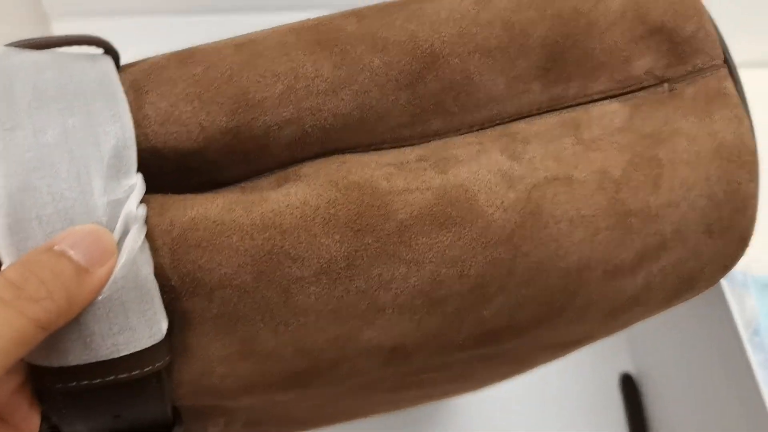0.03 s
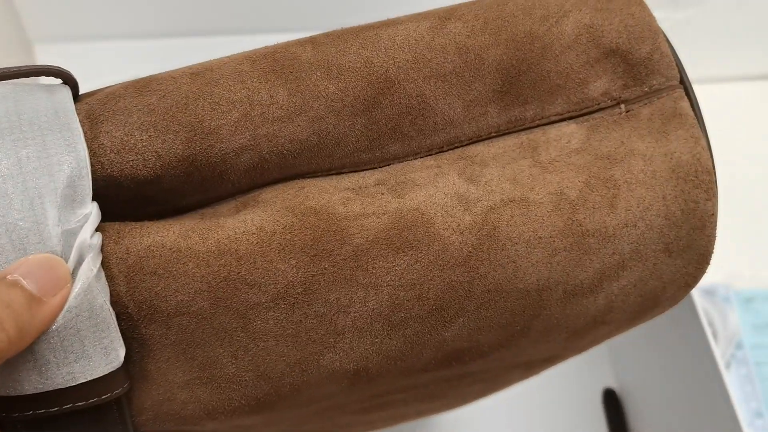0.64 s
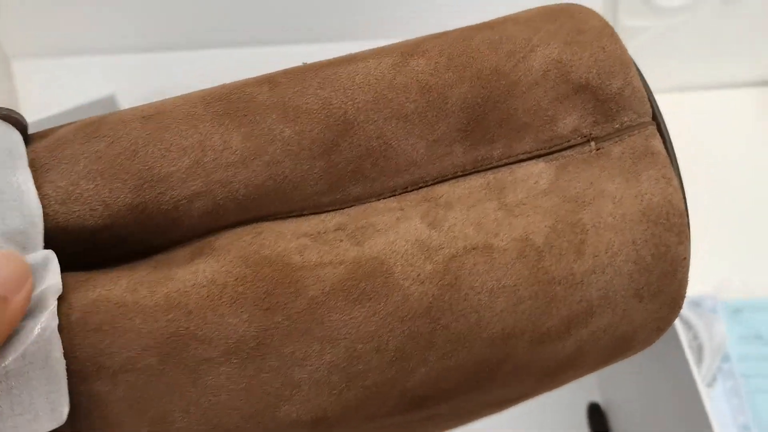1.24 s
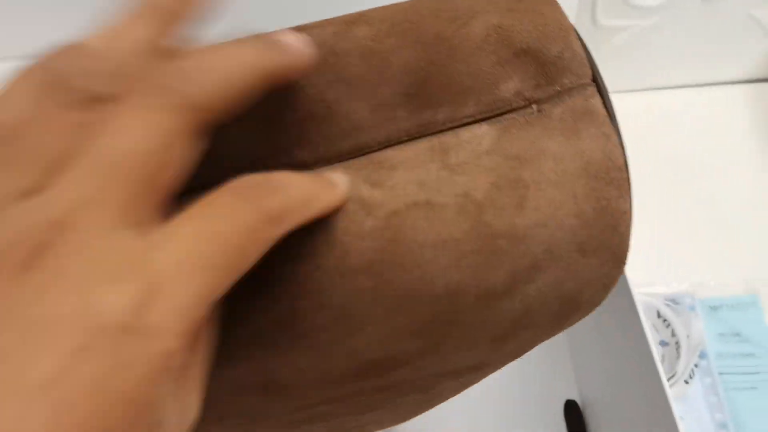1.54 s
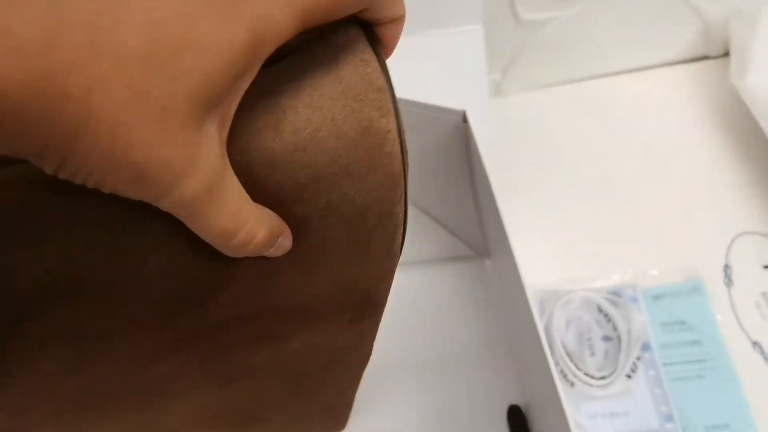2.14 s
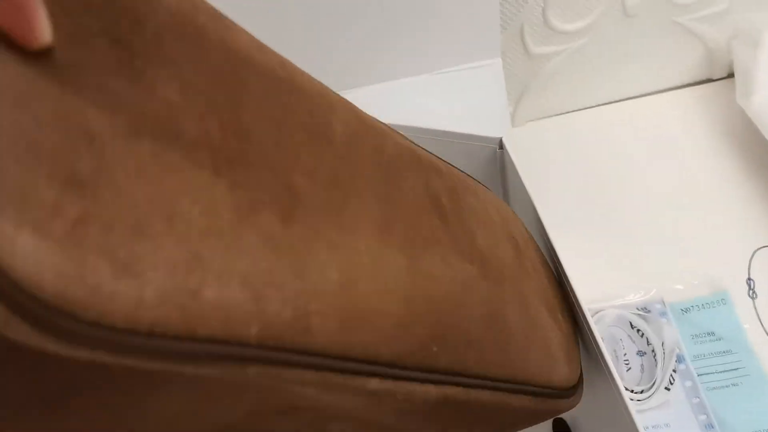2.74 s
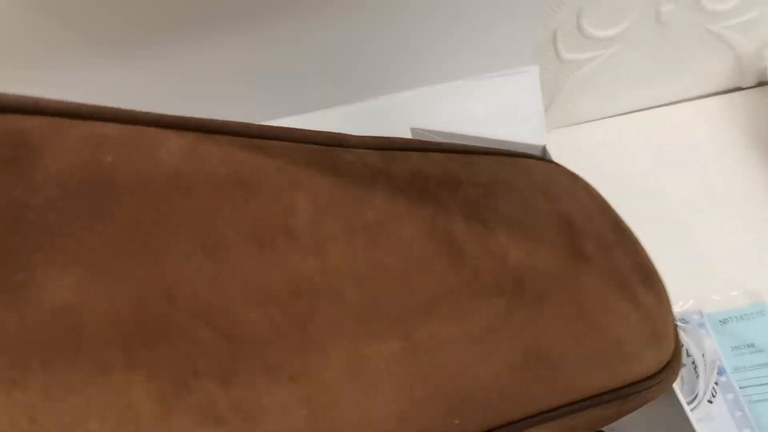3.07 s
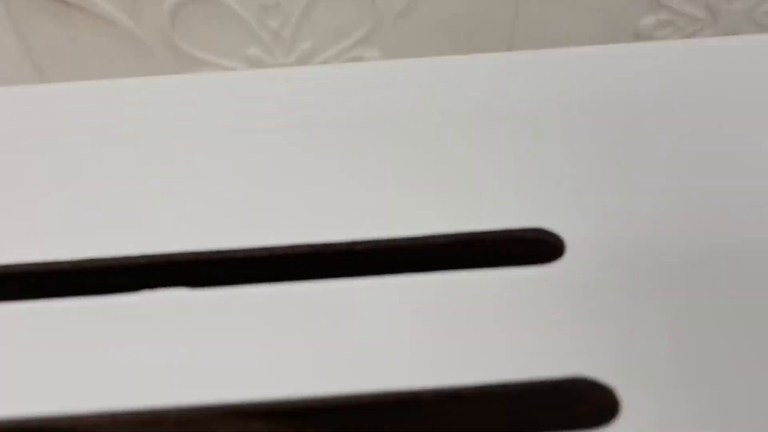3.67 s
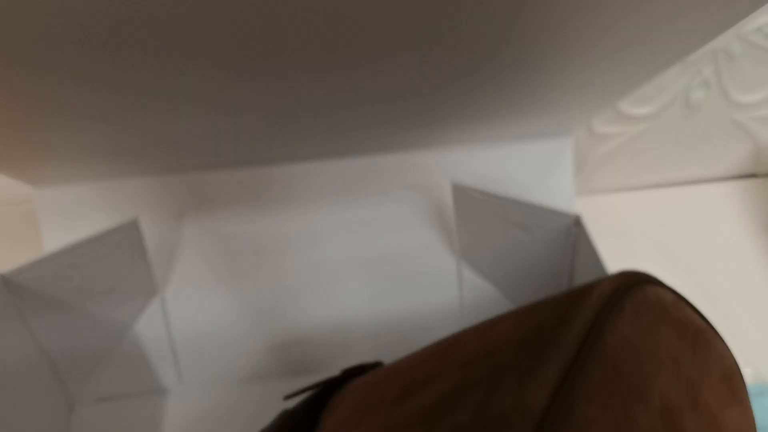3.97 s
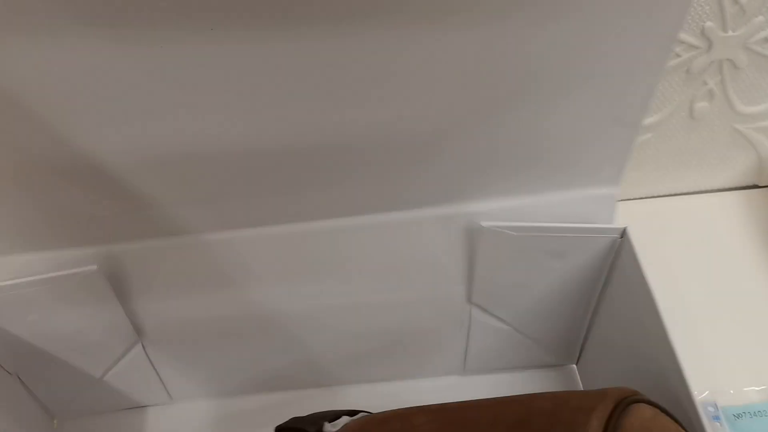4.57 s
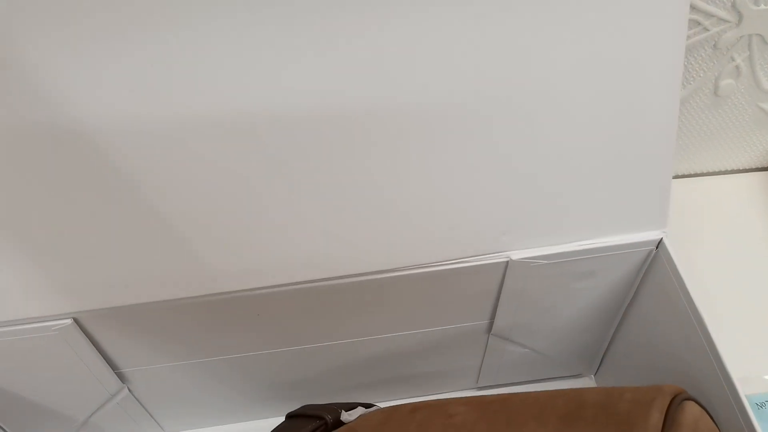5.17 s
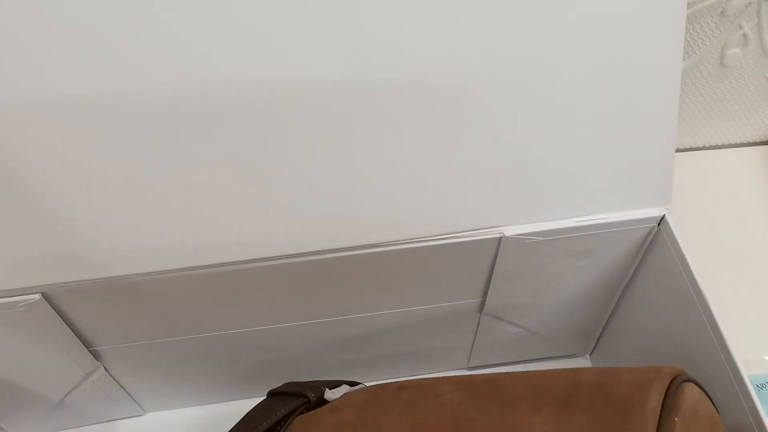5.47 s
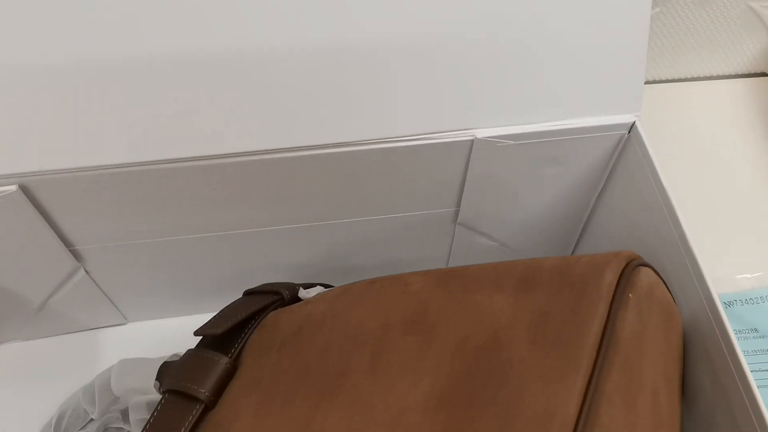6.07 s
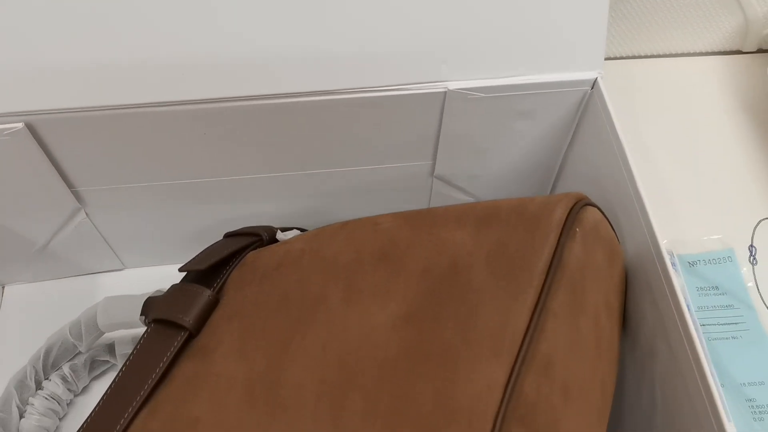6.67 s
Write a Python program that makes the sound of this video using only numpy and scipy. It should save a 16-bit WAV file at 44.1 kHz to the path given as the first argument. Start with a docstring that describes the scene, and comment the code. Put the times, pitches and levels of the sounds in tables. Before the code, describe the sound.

Suede hisses under a hand, then a bag bumps and scrapes inside a hollow cardboard box, its strap fittings ticking lightly.

```python
"""A suede handbag is stroked, gripped and tipped into a large cardboard gift box.
The nap hisses under the hand and along the card, with soft, darker rustles here and there.
Bag and lid knock on the box, which rings hollow while its big panels boom; the bag scrapes and shifts.
Strap fittings and tissue wrapping tick over the low rumble of a small room, all close to a phone."""
import sys
import numpy as np
from scipy import signal
from scipy.fft import rfft, irfft, next_fast_len
from scipy.io import wavfile
from scipy.ndimage import uniform_filter1d, map_coordinates

SR = 44100
rng = np.random.default_rng(int(sys.argv[2]) if len(sys.argv) > 2 else 0)


def file_out(sig):
    """Save sig as 16-bit WAV at sys.argv[1]."""
    # one column per channel
    cols = np.atleast_2d(sig).T
    # limit, then scale
    lim = np.clip(cols, -1, 1)
    pcm = np.round(lim * 32767).astype(np.int16)
    wavfile.write(sys.argv[1], SR, pcm)


N = 300321


def amp(db):
    """Decibels to gain."""
    return 10 ** (np.asarray(db) / 20)


def unit(x):
    """Scale to rms 1."""
    return x / np.sqrt(np.mean(x ** 2) + 1e-20)


def along(points, hz):
    """Read (frequency, value) points on a log-frequency axis."""
    f, v = np.transpose(points)
    return np.interp(np.log(hz + 1), np.log(f + 1), v)


def bump(hz, centre_hz, octaves):
    """A bell on the log-frequency axis."""
    return np.exp(-.5 * (np.log2((hz + 1) / centre_hz) / octaves) ** 2)


def wobble(rate):
    """A smooth random curve, rate knots a second."""
    return map_coordinates(rng.standard_normal(int(N * rate / SR) + 4), [np.arange(N) * rate / SR])


def filtered(x, response):
    """Pass x through a complex frequency response."""
    n = x.shape[-1]
    m = next_fast_len(n + 8192)
    return irfft(rfft(x, m) * response(np.fft.rfftfreq(m, 1 / SR)), m)[..., :n]


def band(x, edges_hz, order):
    """Band-pass x and scale its mid channel to peak 1."""
    y = signal.sosfilt(signal.butter(order, edges_hz, "band", fs=SR, output="sos"), x)
    return y / np.abs(y.mean(0)).max()


def noise(n):
    """Two unrelated channels of white noise."""
    return rng.standard_normal((2, n))


def spread(pair):
    """Turn two unrelated signals into left and right: alike in the bass, apart in the treble."""
    # stereo image: (frequency [Hz], left-right correlation [ratio])
    likeness = [(30, 0.15), (80, 0.87), (300, 0.89), (700, 0.59), (1400, 0.15), (3000, 0.01), (12000, 0.24)]
    turn = lambda hz: np.arccos(along(likeness, hz)) / 2
    mid, side = filtered(pair, lambda hz: np.array([np.cos(turn(hz)), np.sin(turn(hz))]))
    return np.array([mid + side, mid - side])


def panned(x, lean_db):
    """Lean a stereo sound to the left by a level difference."""
    gains = np.array([amp(lean_db / 2), amp(-lean_db / 2)]).reshape(2, -1)
    return x * gains / np.sqrt(np.mean(gains ** 2, axis=0))


def add(track, s, x):
    """Mix x into the track at time s."""
    start = max(round(s * SR), 0)
    track[:, start:start + x.shape[1]] += x[:, :max(N - start, 0)]


def rush(spectrum, grain_db, grain_rate):
    """Coloured stereo noise of rms 1, clumped into grains."""
    grains = noise(N) * amp(grain_db * wobble(grain_rate))
    return unit(filtered(spread(grains), lambda hz: amp(along(spectrum, hz))))


def patchy(x, depth_db):
    """Let the colour drift as the contact patch moves over the folds."""
    spectra = signal.stft(x, nperseg=1024)[2]
    drift = uniform_filter1d(rng.standard_normal(spectra.shape[1:]), size=6, axis=0)
    drift = unit(uniform_filter1d(drift, size=8, axis=1))
    return unit(signal.istft(spectra * amp(depth_db * drift), nperseg=1024)[1][:, :N])


def swells(s, rise, fall, db):
    """Envelope of a run of movements: each speeds up to its peak and dies away; their powers add."""
    shape = 1.52  # 1 is pointed, 2 a bell
    t = np.arange(0, N, 64) / SR
    lag = t[:, None] - s
    from_peak = np.abs(lag) / np.maximum(np.where(lag < 0, rise, fall), .004)
    power = np.sum((amp(db) * np.exp(-from_peak ** shape)) ** 2, axis=1)
    return np.interp(np.arange(N) / SR, t, np.sqrt(power))


def slides(rows, rise_share=0.43):
    """Envelope of the bag's movements, which build faster than they fade."""
    s, length, db = np.transpose(rows)
    return swells(s, rise_share * length, (1 - rise_share) * length, db)


def room_rumble():
    """A low, nearly steady bed of room tone."""
    # room tone: (frequency [Hz], level [dB])
    colour = [(15, -20.5), (30, -17.5), (47, 4.5), (70, -12.5), (140, -9), (190, -22), (290, -11.5),
              (500, -23.5), (900, -24.5), (2000, -35), (3800, -40), (5500, -49), (9000, -50.5),
              (15900, -45)]
    return amp(-51) * panned(rush(colour, grain_db=0.5, grain_rate=6.8), lean_db=2.5)


def weight_shifts():
    """The box murmurs as the bag's weight moves."""
    # shifts of weight: (peak time [s], length [s], level [dB])
    shifts = [(.6, 0.3, -49.5), (2.12, 0.32, -54), (2.65, 0.17, -32), (3.35, 0.11, -23.5), (3.74, .07, -49),
              (4.13, 0.12, -27), (4.74, 0.35, -35), (5.335, 0.058, -33), (6.33, 0.11, -48.5),
              (6.76, 0.43, -49)]
    # hollow tone of the box: (frequency [Hz], level [dB])
    colour = [(70, -10.5), (110, -2), (170, -8), (235, -17), (295, -5), (350, -12.5), (415, -8.5),
              (480, -18.5), (650, -24.5), (1000, -57.5)]
    murmur = rush(colour, grain_db=1.5, grain_rate=35)
    return slides(shifts) * panned(murmur, lean_db=2.5)


def fitting_ticks():
    """Tiny snaps, each with its own colour, a brief ring of the fittings and a short rustle behind."""
    # strap fittings and tissue: (time [s], peak level [dB], centre [Hz], left lean [dB])
    ticks = [(0.5276, -42.5, 4300, -4), (1.1463, -19, 7600, 2), (1.181, -29, 5960, 0),
             (1.33, -25, 3670, -3), (1.8153, -28.5, 4950, 3), (1.9332, -32, 5100, 6),
             (2.0644, -24.5, 3300, 2), (2.116, -33, 3740, 3), (2.443, -20, 7200, 14),
             (2.5674, -9, 6500, -8.5), (3.4073, -38, 2800, -10), (4.952, -24, 4570, -1),
             (5.006, -31.5, 5330, -4), (5.471, -33.5, 5530, -3), (5.5234, -26, 4600, -0.5),
             (5.689, -47, 3570, 2), (6.179, -28, 3540, -1), (6.305, -15.5, 3400, -1.5),
             (6.3493, -35, 2370, -1.5), (6.6963, -29.5, 6200, -1)]
    out, t = np.zeros((2, N)), np.arange(SR // 10) / SR
    ring = lambda f: 1 + 1.4 / (1 + 1j * (f - 3600) / 110)
    envelope = amp(-60 * t / 0.013) + 0.17 * amp(-60 * t / 0.041)
    for s, db, hz, lean_db in ticks:
        snap = filtered(noise(len(t)) * envelope, lambda f: bump(f, hz, octaves=0.76) * ring(f))
        add(out, s, amp(db) * panned(snap / np.abs(snap).max(), lean_db))
    return out


def rustles_and_rings():
    """Soft suede rustles, the darker ones near 3 kHz, and brief hollow rings of the box after knocks."""
    # high rustles, low rings: (peak time [s], length [s], centre [Hz], width [octaves], level [dB])
    accents = [(0.629, 0.16, 3150, 0.34, -67), (1.452, 0.03, 6300, 0.14, -35.5),
               (1.709, 0.05, 310, 0.17, -46.5), (2.729, 0.038, 4950, 0.48, -31.5),
               (2.84, 0.055, 4240, 0.24, -34.5), (2.856, 0.072, 6400, 0.38, -34.5),
               (2.926, 0.067, 1860, 0.044, -51), (3.217, 0.044, 258, 0.25, -29.5),
               (3.365, 0.023, 500, 0.47, -22.5), (4.023, 0.016, 330, .2, -25),
               (4.06, 0.025, 856, 0.2, -21.5), (4.66, 0.022, 375, 0.17, -10.5),
               (5.083, 0.028, 560, 0.31, -34), (5.317, 0.019, 186, 0.083, -25),
               (6.256, 0.31, 2960, 0.62, -49.5), (6.8, 0.062, 3400, 0.37, -38.5)]
    out, t = np.zeros((2, N)), np.arange(SR // 2) / SR
    for s, length, hz, octaves, db in accents:
        noise_band = unit(filtered(noise(len(t)), lambda f: bump(f, hz, octaves)))
        swell = np.exp(-(2 * (t - t.mean()) / length) ** 2)
        add(out, s - t.mean(), amp(db) * noise_band * swell)
    return out


def suede_strokes():
    """Suede fibres slip under the hand and over the card: a hiss, with a sheen from the fine nap."""
    # the grip loosens, the palm slides on, the bag tips in, slides down the wall and settles:
    # (peak time [s], rise [s], fall [s], hiss [dB], sheen offset before its lift [dB], left lean [dB])
    strokes = [ (1.155, 0.029, 0.13, -47, -3, -1), (1.27, 0.039, 0.067, -41.5, -6, -1.5),
               (1.465, 0.024, 0.17, -41.5, -8.5, -3.5), (1.6, 0.13, 0.12, -44.5, -4, 2),
               (1.7, 0.073, 0.045, -43, -11, 0), (1.9, 0.36, 0.43, -55, -10, -0.5),
               (2.446, 0.069, 0.12, -39.5, -3.5, -1.5), (2.54, 0.054, 0.087, -35.5, -4.5, -2.5),
               (2.73, 0.046, 0.075, -46, -2.5, -4.5), (2.854, 0.038, 0.077, -46.5, -2, -1),
               (2.983, 0.09, 0.063, -44, -2.5, -2), (3.215, 0.024, 0.023, -43.5, 0, -3.5),
               (3.268, 0.014, 0.012, -36.5, -8.5, -2), (3.45, 0.008, 0.036, -49.5, -6.5, -0.5),
               (3.54, 0.043, 0.072, -63.5, -3, -0.5), (3.745, 0.035, 0.042, -54, 0.5, 0),
               (3.891, 0.034, 0.11, -49.5, -14, -3.5), (3.98, 0.11, 0.095, -46, 1.5, -2),
               (4.065, 0.055, 0.12, -38, -7.5, -2), (4.25, 0.074, 0.043, -41.5, -8, -2),
               (4.59, 0.082, 0.11, -44, -9, 0), (4.655, 0.05, 0.11, -34.5, -9.5, -2.5),
               (4.85, 0.099, 0.069, -42, -4.5, -1), (5.1, 0.045, 0.05, -61.5, -1.5, -1),
               (5.29, 0.075, 0.079, -44.5, -2.5, -1.5), (5.44, 0.11, 0.12, -59.5, -3, -1.5),
               (5.8, 0.13, 0.29, -74.5, -3.5, -3), (6.08, 0.063, .07, -52, -9.5, 2.5),
               (6.18, 0.053, 0.028, -49, -7.5, 2.5), (6.3, 0.058, 0.056, -43.5, -7, 0.5),
               (6.61, .11, 0.029, -49.5, -6.5, 0), (6.8, 0.067, 0.066, -37, -10, -1.5)]
    # hiss of the nap: (frequency [Hz], level [dB])
    hiss_colour = [(900, -24), (1700, -9), (2400, -5.5), (3500, -1.5), (4200, 1), (5000, -6.5), (6800, 0),
                   (8300, -12), (10000, -12), (13000, -34)]
    # airy top of the fine nap: (frequency [Hz], level [dB])
    sheen_colour = [(5000, -19.5), (8500, -8.5), (9950, -8), (10800, -8), (15100, -15.5), (15900, -19.5)]
    sheen_lift_db = 3
    s, rise, fall, hiss_db, sheen_db, lean_db = np.transpose(strokes)
    stroked = lambda db: np.array([swells(s, rise, fall, db + side * lean_db / 2) for side in (1, -1)])
    hiss = patchy(rush(hiss_colour, grain_db=2.5, grain_rate=1200), depth_db=3.0)
    sheen = patchy(rush(sheen_colour, grain_db=2.0, grain_rate=1300), depth_db=2.3)
    sheen *= stroked(hiss_db + sheen_db + sheen_lift_db)
    return stroked(hiss_db) * hiss + panned(sheen, lean_db=4)


def box_walls(hz):
    """The card answers at once, then rings in its resonances."""
    # box resonances: (frequency [Hz], bandwidth [Hz], level [dB])
    modes = [(179, 26, 10), (233.2, 33, 7), (296.4, 27, -2), (329, 48, 4), (423.5, 52, 5), (532, 81, 10),
             (668, 36, -1.5), (798, 23, 3.5), (873, 22, 1), (1140, 13, -13.5), (1298, 36, -9),
             (1414, 75, 0.5), (1524, 78, -6.5), (1880, 70, -21), (2120, 24, 2.5)]
    direct = 0.35 / (1 + 1j * hz / 1500)
    return direct + sum(amp(db) * 1j * hz * width / (centre ** 2 - hz ** 2 + 1j * hz * width)
                        for centre, width, db in modes)


def box_knocks():
    """Each blow is one push and a dying chatter of card on card, rung through the box walls."""
    # blows: (time [s], slap peak [dB], hollow re slap [dB], crack re slap [dB], left lean [dB])
    knocks = [(1.33, -46, 9, 7, 7), (2.554, -14, -5.5, -26, 1), (2.565, -21.5, 6, -17, 7),
              (2.615, -29.5, 12, 0, 2), (2.711, -34, 5, -12, 3), (3.2912, -10, -2, -29, 14),
              (3.32, -22.5, -1, -23, -5), (3.346, -21, 5, -22, 1), (3.3645, -21.5, 10.5, -40, -10),
              (3.5538, -23.5, -7, -18, 0.5), (3.709, -22, 5, -5, 6), (4.0152, -15, 7, -30, 3),
              (4.044, -22, 2, -3, -2), (4.052, -16, 7, 3.5, 0), (4.068, -16, 6.5, -1, 6),
              (4.253, -28.5, 7.5, -1, 1), (4.644, -14.5, -1, 7.5, 0), (4.649, -4, -4, -2.5, -1),
              (4.655, -12, -4, -10, 8), (4.706, -8.5, -1, -6.5, 3.5), (4.82, -26.5, -1, -8, 3),
              (4.849, -22, 1.5, -4, 6), (4.877, -20, 0, -21, 1.5), (4.945, -19.5, -3.5, -13, 2),
              (5.05, -29.5, 2, -9.5, 4), (5.079, -34.5, -20, -5, -4), (5.312, -37.5, 7.5, 6.5, -2)]
    # crack of the card's edge: (frequency [Hz], level [dB])
    crack_colour = [(1060, -32), (1800, -3), (2970, -9), (3660, -5), (7260, -16), (8170, -20), (10400, -14),
                    (15900, -27)]
    hard_hz, softest_hz, chatter_t60_s = 2500, 900, 0.064
    out, t = np.zeros((2, N)), np.arange(SR // 3) / SR
    push = 7 * np.exp(-t / .00012)
    dulled = lambda x, cutoff: filtered(x, lambda hz: 1 / (1 + (hz / cutoff) ** 6))
    for s, db, hollow_db, crack_db, lean_db in knocks:
        # weaker and hollower blows make softer contact, so their slap is duller
        contact_hz = max(hard_hz * 2 ** (db / 22 - hollow_db / 30), softest_hz)
        chatter = spread(noise(len(t))) * amp(-60 * t / chatter_t60_s)
        walls = filtered(chatter + push, box_walls)
        slap = band(dulled(walls, contact_hz), [520, 1900], order=2)
        hollow = amp(hollow_db) * band(dulled(walls, 520), [250, 480], order=1)
        # the edge of the card snaps, then scuffs briefly
        edge = noise(len(t)) * (amp(-60 * t / 0.022) + 0.053 * amp(-60 * t / .07))
        edge = filtered(edge, lambda hz: amp(along(crack_colour, hz)))
        crack = amp(crack_db) * edge / np.abs(edge).max()
        add(out, s, amp(db) * panned(slap + hollow + crack, lean_db))
    return out


def bag_scrapes():
    """The bag slides along the card with a grainy midrange rasp."""
    # scrapes: (peak time [s], length [s], level [dB])
    scrapes = [(1.34, 0.032, -50.5), (1.725, .04, -55), (2.15, 0.06, -49), (2.44, 0.14, -44.5),
               (2.575, 0.068, -38.5), (2.715, 0.039, -44.5), (3.12, 0.23, -54.5), (3.32, 0.24, -45.5),
               (3.878, 0.023, -42.5), (4.08, 0.11, -34), (4.235, 0.12, -37), (4.58, 0.16, -41),
               (4.71, .1, -40), (4.86, .14, -48.5), (5.33, 0.037, -46), (5.528, 0.034, -48),
               (6.1, 0.23, -57.5), (6.31, 0.092, -53.5), (6.785, 0.15, -54.5)]
    # rasp of the card: (frequency [Hz], level [dB])
    colour = [(290, -8.5), (500, 0), (585, -1.5), (708, -18), (797, -0.5), (1170, -10.5), (1360, -8),
              (1580, -16), (2020, -11), (2400, -12.5), (3120, -39), (5280, -120)]
    return slides(scrapes) * patchy(rush(colour, grain_db=1.5, grain_rate=250), depth_db=3.0)


def panel_booms():
    """The broad panels heave and sway at a low pitch; the whole box rocks about an octave lower."""
    # heaves of the panels: (start [s], peak level [dB], swell time [s])
    booms = [(2.555, -18, 0.013), (2.615, -15, 0.038), (2.737, -32, 0.035), (3.054, -32, 0.048),
             (3.202, -17.5, 0.025), (3.278, -19.5, 0.013), (3.356, -24, 0.025), (3.428, -20.5, 0.025),
             (3.53, -31, 0.058), (3.704, -20.5, 0.0044), (4.042, -12.5, 0.038), (4.188, -35.5, 0.078),
             (4.646, -14, 0.012), (4.707, -18.5, 0.024), (4.913, -29, 0.037), (5.335, -22, 0.023),
             (5.433, -36.5, 0.006), (6.628, -33.5, 0.022)]
    panel_hz, pitch_scatter = 98.04, 0.034
    out, t = np.zeros((2, N)), np.arange(SR // 2) / SR
    for s, db, swell_s in booms:
        hz = panel_hz * (1 + pitch_scatter * rng.standard_normal())
        panel = np.sin(2 * np.pi * hz * t + np.array([[.3], [-.3]]))
        rock = unit(filtered(spread(noise(len(t))), lambda f: bump(f, centre_hz=54, octaves=0.19)))
        flex = unit(filtered(spread(noise(len(t))), lambda f: bump(f, centre_hz=138.2, octaves=0.29)))
        sway = panel + amp(-17) * rock + amp(-15) * flex
        age = t / max(swell_s, .005)
        heave = age * np.exp((1 - age ** 2) / 2)
        add(out, s, amp(db) * panned(sway * heave, lean_db=5.0))
    return out


def room_echo(x):
    """The room's walls answer after 5 ms; the bass lingers longest."""
    # reverb decay: (frequency [Hz], time to fall 60 dB [s])
    decay = [(100, 0.64), (400, 0.17), (1500, 0.33), (5000, 0.11), (14000, 0.081)]
    hz, t, spectra = signal.stft(noise(SR * 3 // 4), SR, nperseg=256)
    spectra *= amp(-60 * t / along(decay, hz)[:, None])
    tail = spread(signal.istft(spectra, SR, nperseg=256)[1])
    delayed = np.pad(x, ((0, 0), (SR // 200, 0)))
    return signal.fftconvolve(delayed, tail / np.linalg.norm(tail[0]), axes=1)[:, :N]


def scene():
    """Close handling sounds, their echo and the room's own rumble."""
    tremble = amp(1.7 * wobble(rate=45))  # unsteady pressure, shared by strokes and scrapes
    rubbing = tremble * (suede_strokes() + bag_scrapes())
    near = rubbing + rustles_and_rings() + fitting_ticks() + box_knocks() + panel_booms()
    near += weight_shifts()
    return near + room_rumble() + amp(-10.5) * room_echo(near)


def record(dry):
    """The left microphone is a little nearer; the phone rounds off tall peaks and limits the band."""
    left_lead_s, ceiling, top_hz = .00015, 0.8, 15900
    rounded = dry / (1 + (dry / ceiling) ** 4) ** .25
    arrival = lambda hz: np.exp(1j * np.pi * left_lead_s * np.array([hz, -hz]))
    return filtered(rounded, lambda hz: (hz < top_hz) * arrival(hz))


dry = scene()
out = record(dry)
file_out(out)
```